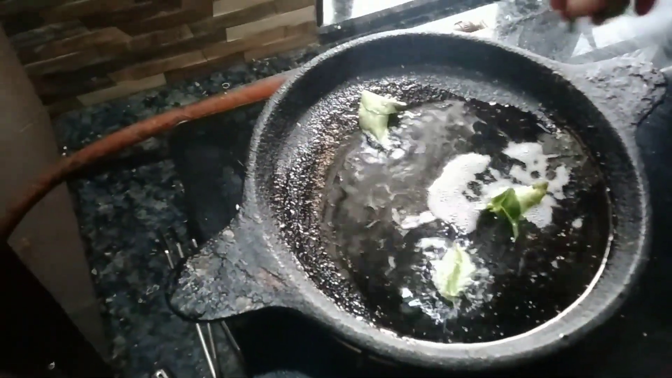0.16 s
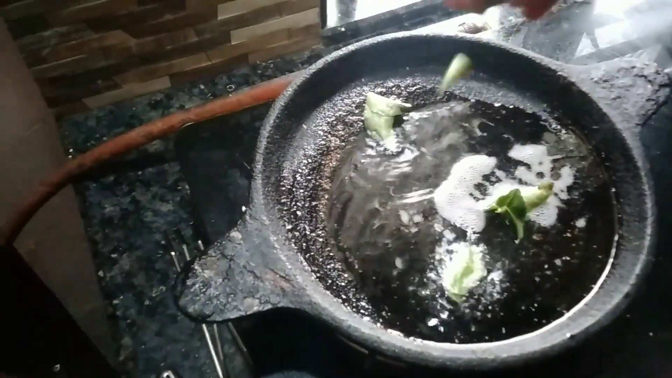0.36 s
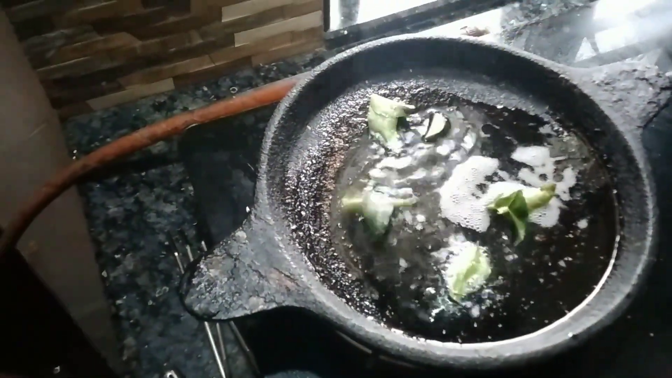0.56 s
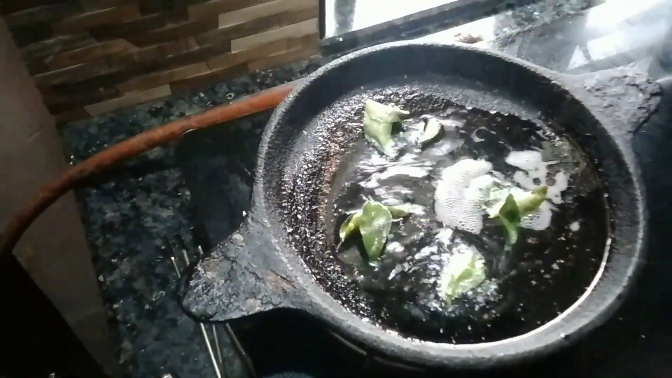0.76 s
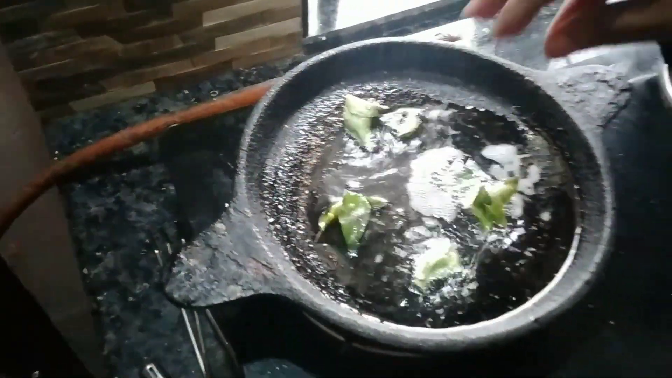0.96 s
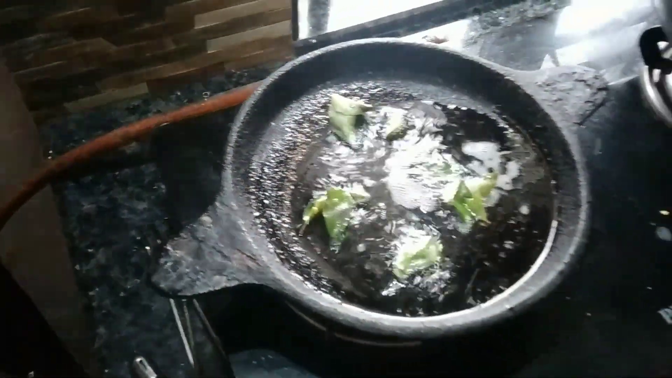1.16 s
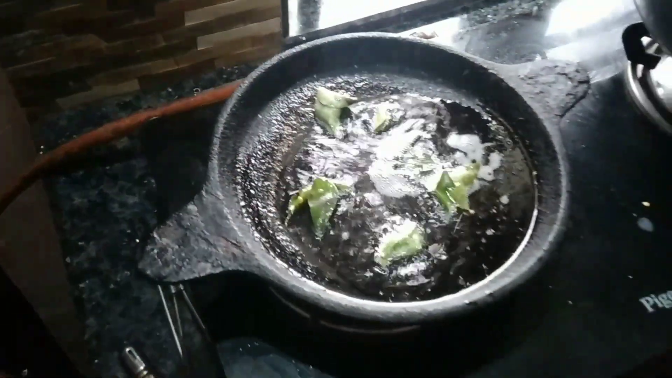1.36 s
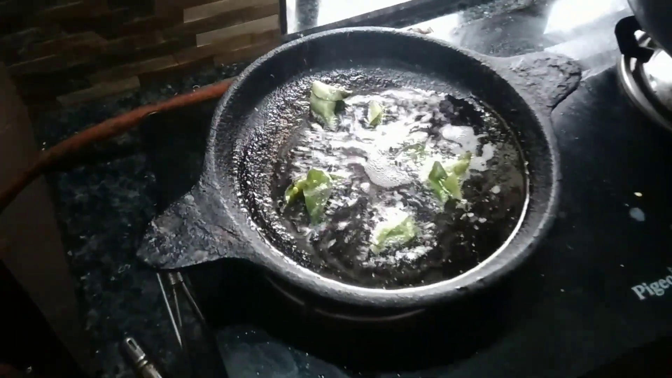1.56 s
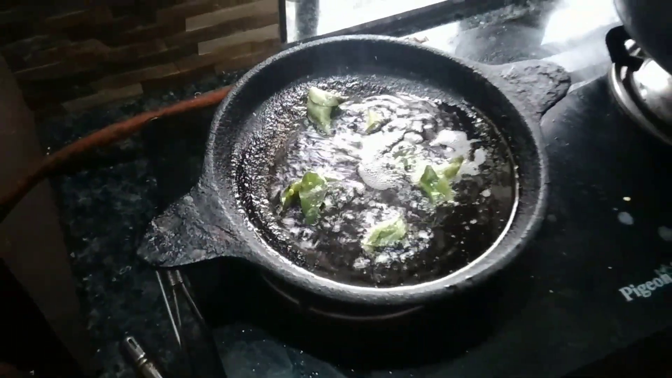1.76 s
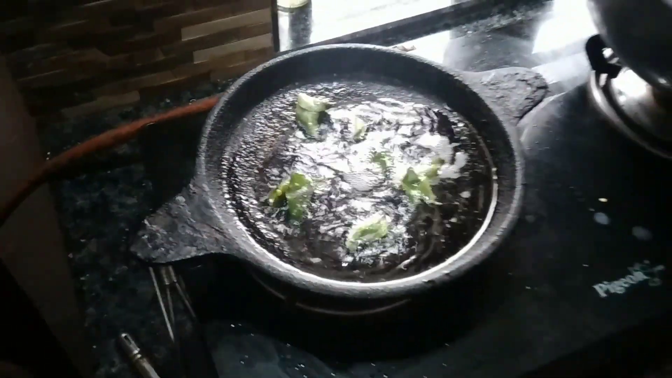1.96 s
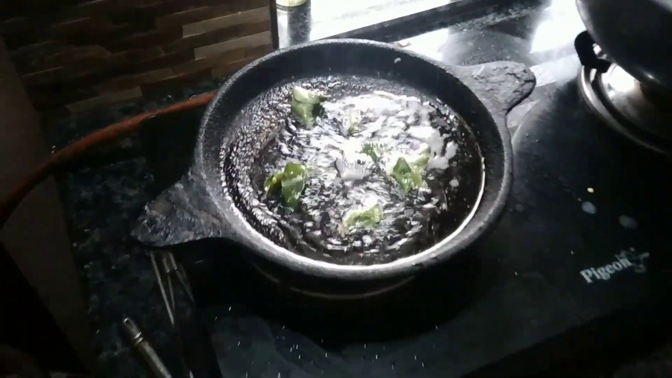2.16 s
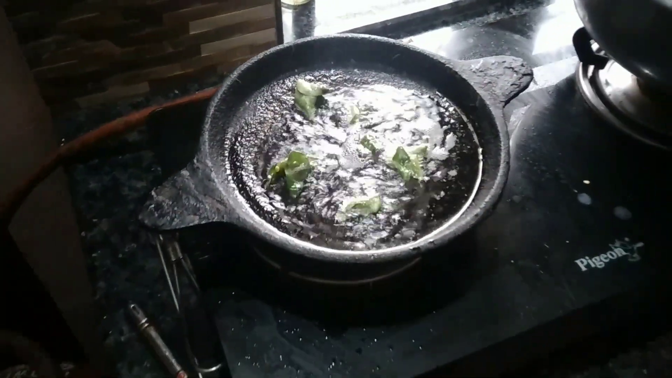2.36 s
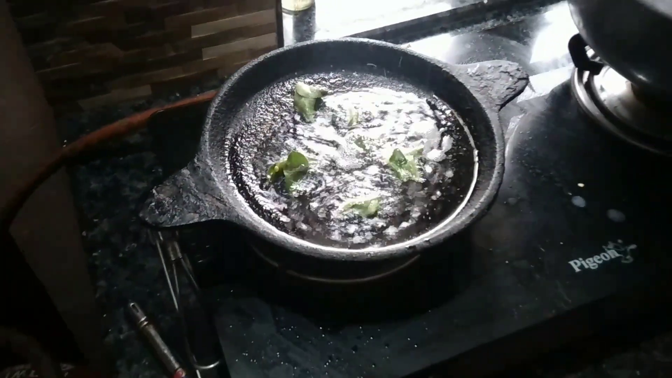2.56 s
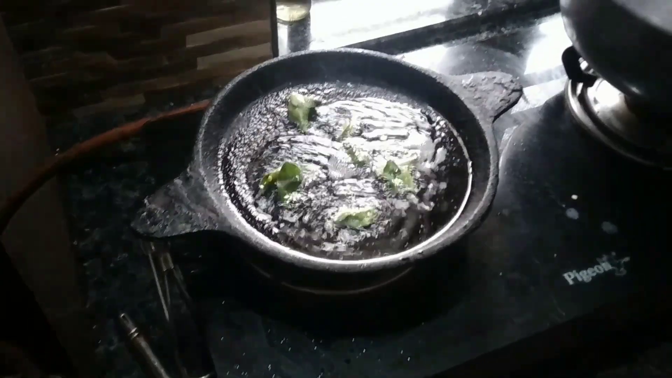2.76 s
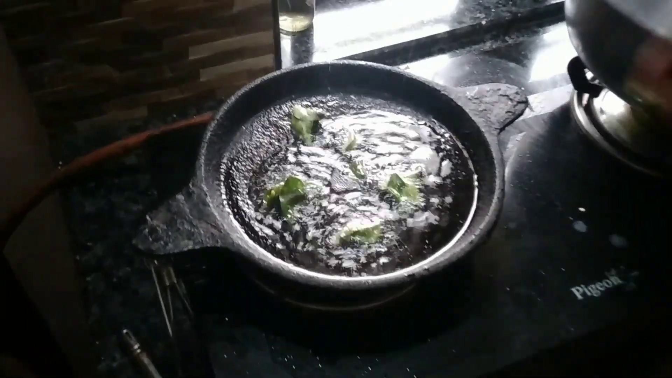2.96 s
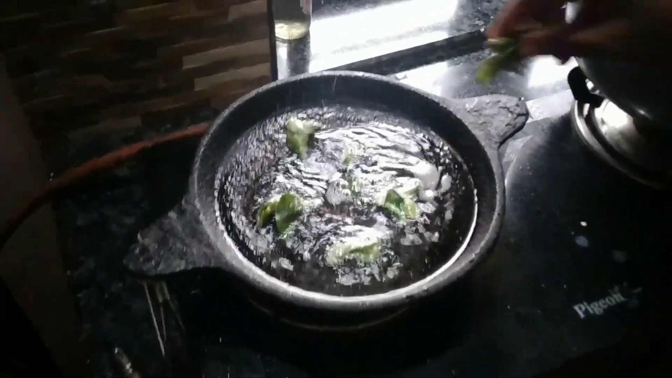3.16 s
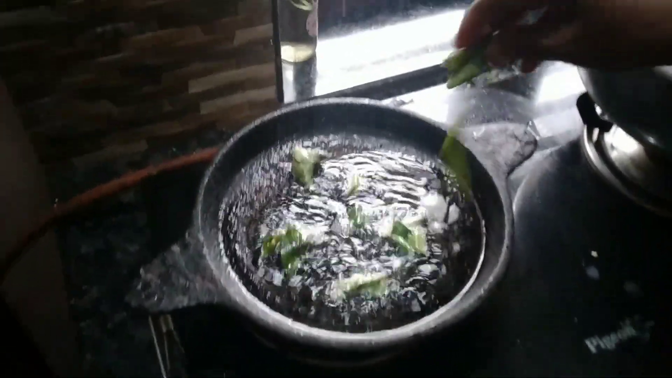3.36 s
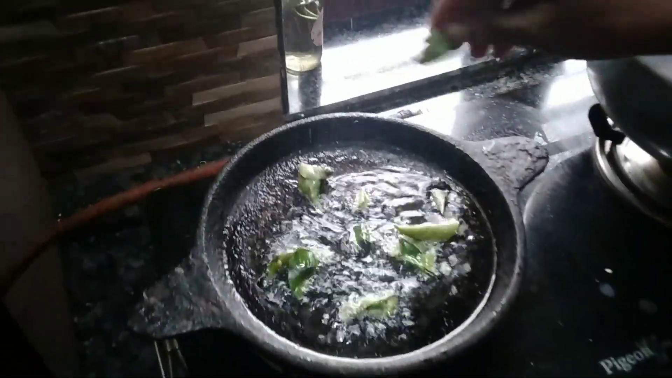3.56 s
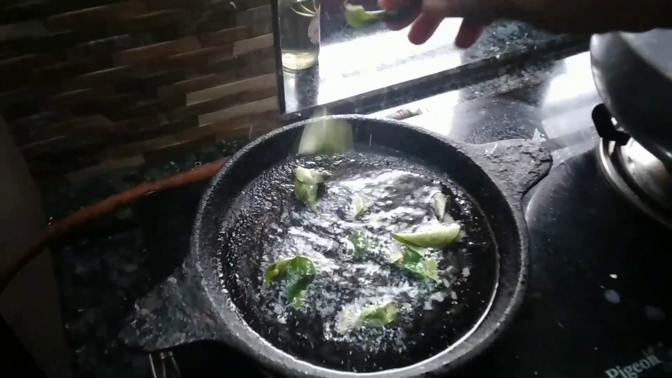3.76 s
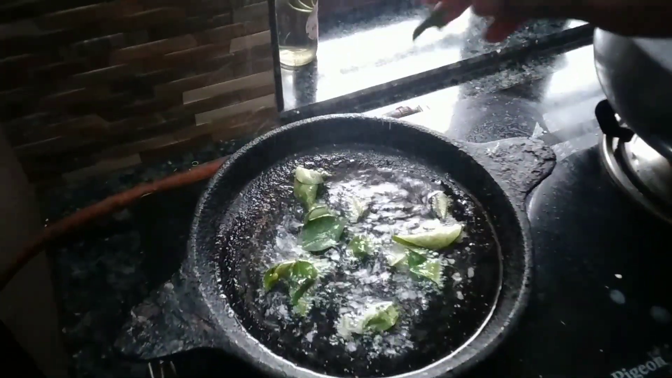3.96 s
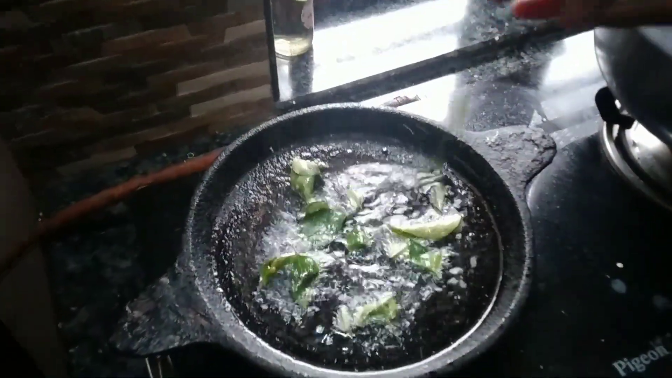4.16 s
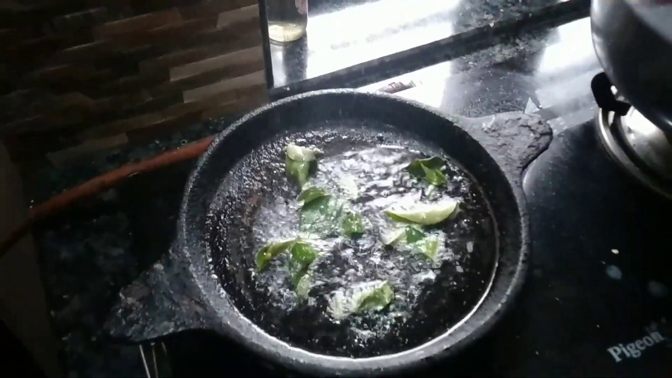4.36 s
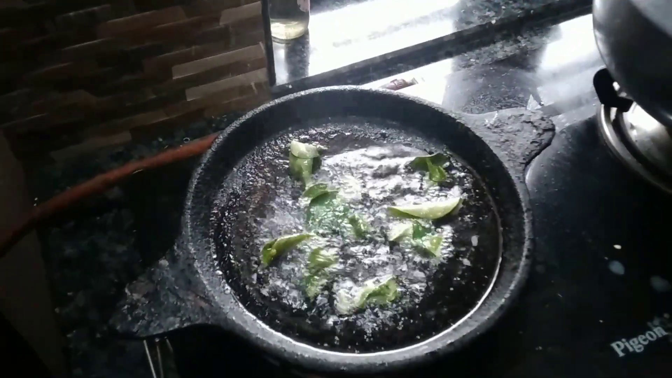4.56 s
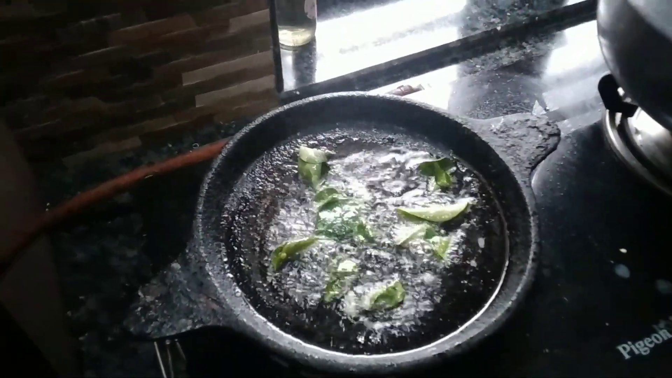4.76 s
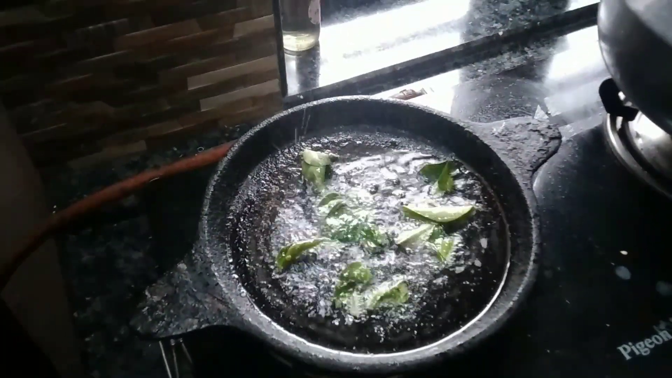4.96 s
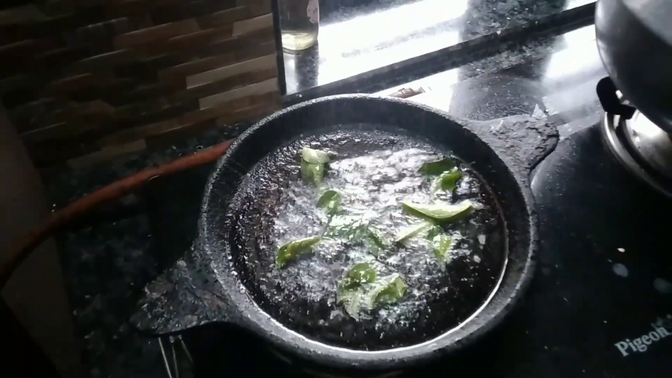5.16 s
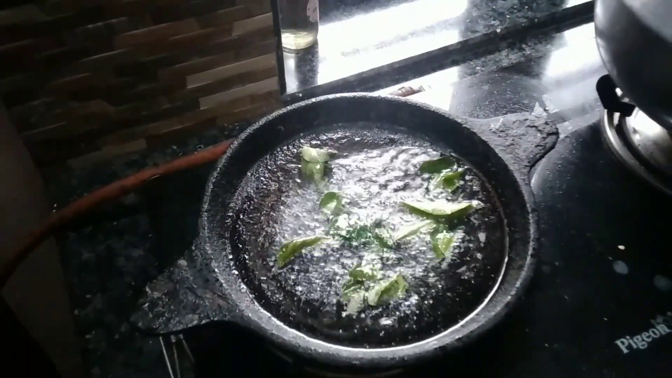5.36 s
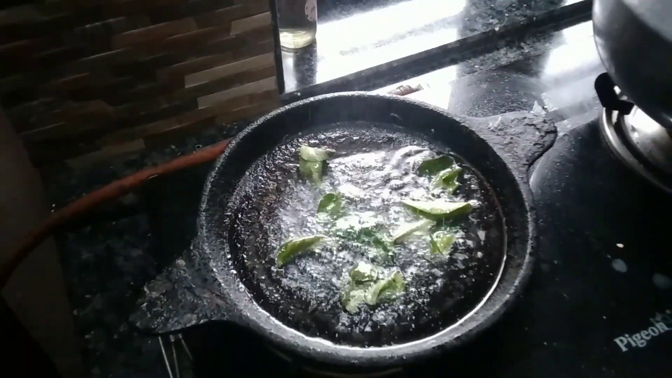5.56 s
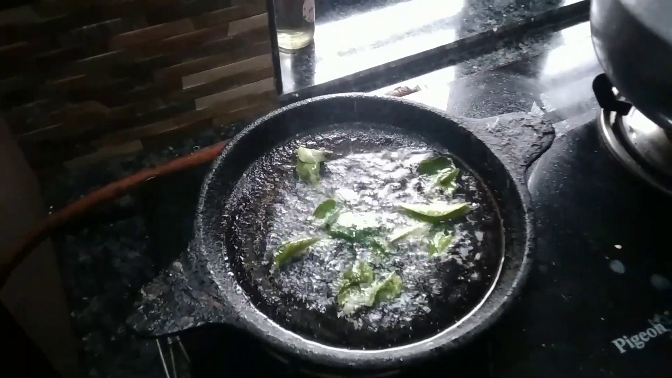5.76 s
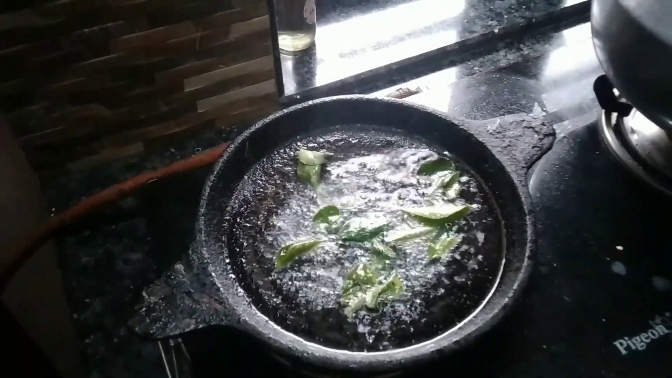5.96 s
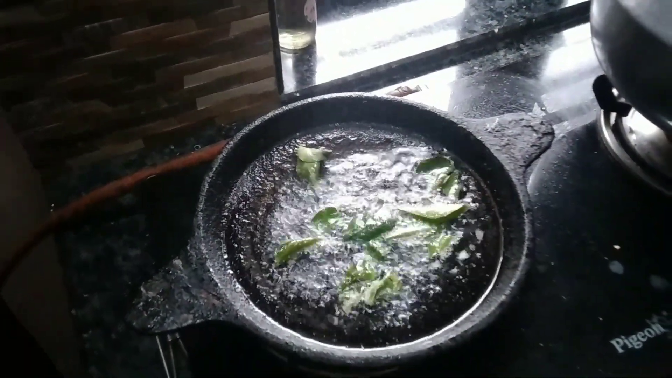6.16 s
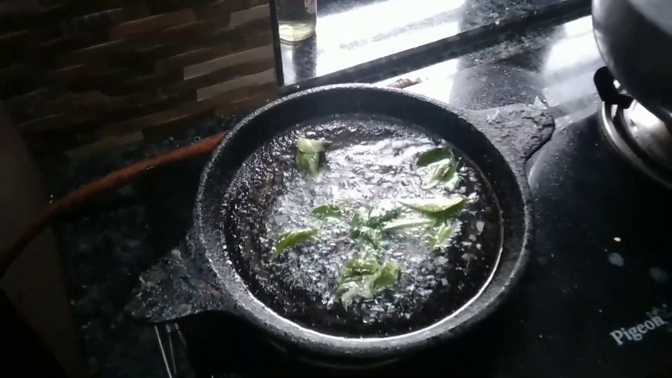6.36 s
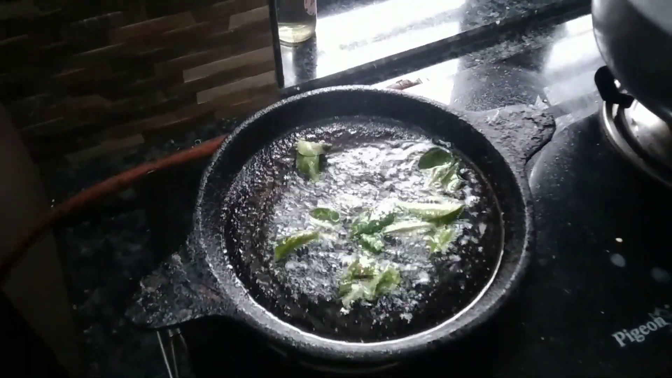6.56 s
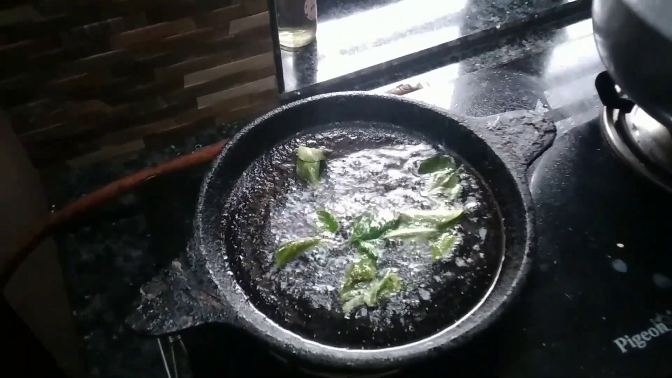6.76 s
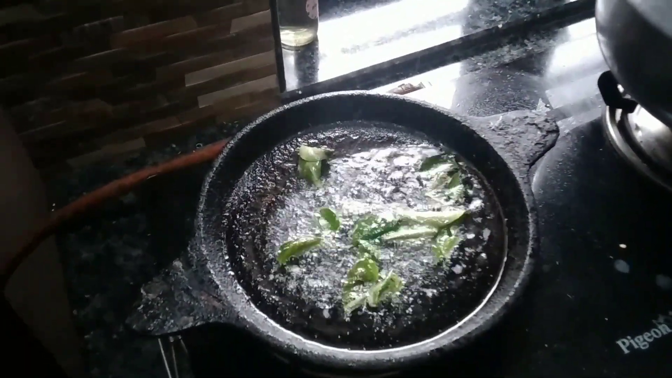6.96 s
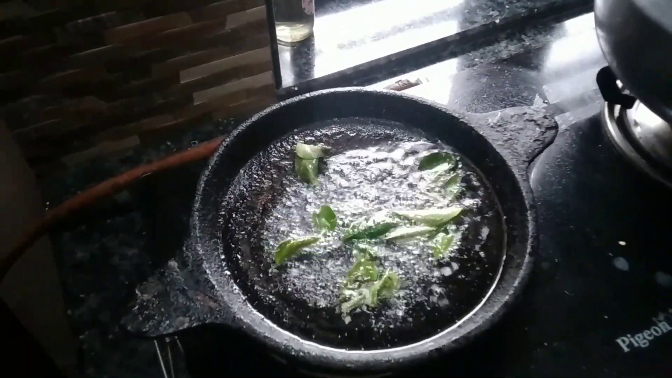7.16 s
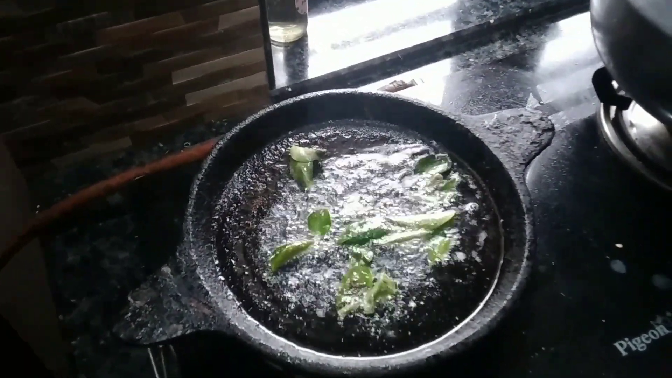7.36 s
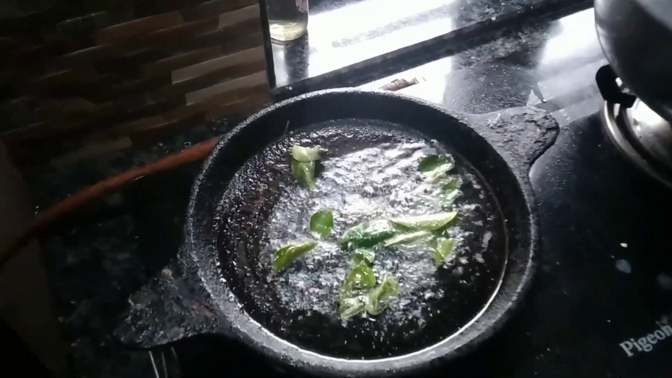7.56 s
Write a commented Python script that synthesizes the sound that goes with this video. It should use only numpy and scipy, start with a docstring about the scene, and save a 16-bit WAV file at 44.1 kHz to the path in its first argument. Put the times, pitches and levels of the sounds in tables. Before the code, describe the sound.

Close up, wet leaves sizzle in an iron pan of hot oil. The fizz dips at first, then swells over several seconds, with bubbling gurgles and constant irregular pops and sharp snaps that briefly ring the pan. A distant thud comes midway; around five seconds a hard splash jolts the stereo microphone at the peak. The sizzle eases slightly and a louder thud follows, over low kitchen rumble.

```python
"""Wet leaves fry in an iron pan of hot oil, close to a hand-held microphone with two ports.
From the start, over a low room rumble, clumps of tiny bubbles fizz, large ones gurgle, water pops and snaps.
The fizz sinks at first, then grows; all bubbles are short rising tones that echo and ring the pan.
A far thud falls in the kitchen midway. Near 5 s one splash jolts the microphone as the fizz peaks.
The fizz then eases a little, and a second, louder thud follows before the end."""
import sys
import numpy as np
from scipy import signal
from scipy.fft import rfft, irfft, next_fast_len
from scipy.io import wavfile
from scipy.ndimage import uniform_filter1d

SR = 44100
rng = np.random.default_rng(int(sys.argv[2]) if len(sys.argv) > 2 else 0)


def put_to_file(sound):
    """Save the sound as 16-bit audio at rate SR, in the file named by the first command-line argument."""
    columns = np.atleast_2d(sound).T  # one column per channel
    safe = np.clip(columns, -1, 1)
    whole_steps = np.round(safe * 32767)
    wavfile.write(sys.argv[1], SR, whole_steps.astype(np.int16))


def attenuation_scalar(level_db):
    """Turn a level in dB into a linear amplitude multiplier (20 dB per decade)."""
    decades = np.asarray(level_db, float) / 20
    return 10 ** decades


N = 336483  # length in samples

# The room: tilt of the rumble (frequency [Hz], gain [dB])
RUMBLE_COLOUR = [(50, -7), (80, -18), (150, 15), (200, -3), (300, 7), (500, -3), (900, 12), (1500, -53)]
# Wavering room tones (frequency [Hz], level [dB], rate of wavering [Hz])
ROOM_TONES = [(68.6, -63, 17), (134.8, -57.5, 38), (233.7, -60, 1.2), (355, -62.5, 6.1), (475, -61.5, 10)]
# Changes in the air moving past the ports (time [s], lift [dB], length [s])
GUSTS = [(1.55, 10, 0.21), (2.75, 2, .3), (3.15, 2, .2), (4.5, -1, .15), (5.75, 10, 0.33), (6.9, 1, .4)]
# Far thuds (time [s], level [dB])
THUD_TIMES = [(3.6, -10), (6.842, -3)]
# Tones inside each thud (frequency [Hz], level [dB], time to fall 60 dB [s])
THUD_TONES = [(119.5, -39, 0.73), (357, -33.5, 0.95), (515, -35.5, 1)]
# Ringing tones of the iron pan (frequency [Hz], relative level [dB], time to fall 60 dB [s])
PAN_TONES = [(920, -16.5, 0.13), (1023, -11.5, .1), (1098, -9, 0.18), (1389.4, -2.5, 0.14),
             (1537, -15, .25), (1630, -10.5, 0.21), (1850, -5, 0.075), (1893, -5.5, 0.14), (1956, -9, 0.16),
             (2260, -7, 0.18), (2400, -1, .03), (2603, -4, 0.044), (2647, -6, .2), (4020, -5, 0.08)]
# Water drops boiling off under the oil
# (time [s], peak level [dB], starting pitch [Hz], low push [dB relative], ring length [cycles])
POPS = [(0.007, -18, 1730, -23, 3.7), (0.018, -22, 1080, -28, 1.4), (0.051, -22, 2750, -34, 6.2),
        (0.189, -23, 2570, -27, 2.8), (0.214, -23, 1870, -4, 1.4), (0.285, -18, 2650, -34, 4),
        (0.521, -19, 1900, -33, 5), (0.542, -15.5, 1860, -35, 5), (0.592, -14.5, 2570, -34, 3),
        (0.619, -8, 1690, -41, 4.3), (0.751, -24, 1690, -27, 2.3), (0.887, -18, 1830, -32, 3.1),
        (0.922, -14.5, 2640, -33, 3.3), (0.962, -14, 1800, -32, 1.8), (1.0, -18, 2590, -25, 6),
        (1.04, -15.5, 1500, -33, 2.1), (1.05, -16, 2640, -30, 4), (1.137, -14.5, 2650, -36, 2.3),
        (1.345, -19, 2370, -21, 2.5), (1.465, -14.5, 2380, -41, 4), (1.538, -12.5, 2530, -22, 4),
        (1.58, -10, 1830, -29, 3), (1.694, -18, 1860, -36, 6.3), (1.72, -15, 1850, -34, 6.5),
        (1.751, -16.5, 1810, -35, 4), (1.807, -9, 1800, -31, 9.4), (1.934, -14, 1900, -29, 2.4),
        (1.947, -13.5, 1870, -16, 2.9), (2.114, -25, 1900, -25, 3.7), (2.204, -23, 1080, -28, 3.6),
        (2.302, -13.5, 1890, -36, 6.7), (2.437, -10, 1940, -41, 6.1), (2.46, -15.5, 2570, -33, 5.6),
        (2.593, -15, 1870, -33, 2.9), (2.882, -18, 1920, -26, 4.8), (2.935, -23, 1900, -40, 4),
        (2.953, -8.5, 2650, -33, 2), (3.078, -12, 1850, -27, 2.9), (3.145, -18, 2400, -25, 3.1),
        (3.221, -14, 1880, -29, 5.6), (3.331, -14, 1880, -26, 4), (3.373, -19, 1890, -34, 5.7),
        (3.391, -13, 1904, -30, 11), (3.506, -17, 2650, -34, 4), (3.535, -16, 1890, -28, 8.3),
        (3.627, -4, 1710, -34, 7), (3.695, -14, 1390, -32, 6), (3.712, -7, 1900, -29, 12),
        (3.787, -15, 1840, -19, 4), (3.833, -12.5, 2580, -29, 2.5), (3.898, -14, 1910, -25, 2.4),
        (3.956, -13, 1590, -25, 2.2), (4.069, -20, 2650, -30, 3.5), (4.118, -20, 1160, -31, 2.4),
        (4.186, -19, 2660, -30, 3.7), (4.218, -20, 1370, -30, 5.7), (4.319, -7.5, 1840, -29, 3.7),
        (4.333, -3, 1890, -29, 2), (4.379, -12, 1760, -34, 4), (4.529, -8.5, 2590, -33, 2.3),
        (4.582, -14, 2730, -33, 2.8), (4.624, -10, 2800, -35, 3.6), (4.659, -22, 1970, -31, 6.2),
        (4.734, -12.5, 1930, -36, 7.7), (4.759, -14, 1430, -33, 3.7), (4.812, -11.5, 1870, -32, 6.3),
        (4.839, -15.5, 1330, -31, 2.6), (4.904, -9, 1930, -35, 3.2), (5.021, -10.5, 2600, -40, 4),
        (5.077, -17, 2640, -28, 3.4), (5.126, -10.5, 2030, -29, 2.9), (5.209, -13, 2220, -25, 4),
        (5.313, -21, 1940, -32, 5.1), (5.389, -13, 1690, -27, 1.3), (5.496, -13.5, 1720, -28, 2.7),
        (5.553, -11.5, 1910, -32, 4), (5.595, -17, 1390, -29, 7.3), (5.727, -15, 1850, -31, 4),
        (5.822, -15.5, 1860, -31, 4), (5.927, -16, 1850, -27, 4), (6.069, -13, 1790, -31, 1.5),
        (6.101, -12, 1810, -31, 2.3), (6.129, -11, 2620, -35, 4.8), (6.241, -12.5, 2540, -38, 5.9),
        (6.307, -11.5, 2920, -35, 4), (6.416, -31, 1720, -26, 4.8), (6.544, -14.5, 1880, -37, 4.6),
        (6.578, -13, 2490, -29, 3.3), (6.773, -16, 1940, -27, 4), (6.866, -22, 1670, -22, 3.4),
        (6.924, -19, 1370, -20, 3.6), (7.004, -21, 2400, -17, 3.3), (7.027, -18, 1360, -17, 2.6),
        (7.041, -12.5, 1950, -31, 4), (7.161, -17, 1760, -27, 4), (7.184, -16, 1900, -31, 4.9),
        (7.334, -22, 1360, -42, 4), (7.606, -19, 2660, -31, 5.8)]
# Sharp bursts at the surface
# (time [s], peak level [dB], starting pitch [Hz], air from 8 kHz up [dB relative to the burst])
SNAPS = [(0.017, -24, 5380, -36), (0.0232, -10.5, 4400, -36), (0.0314, -5.5, 5320, -41),
         (0.1393, -15, 3850, -29), (0.154, -10, 6100, -33), (0.19, -7.5, 6100, -35),
         (0.2463, -14, 6180, -31), (0.2614, -20, 5250, -30), (0.2882, -13, 4330, -33),
         (0.3215, -7.5, 6200, -40), (0.389, -19.5, 6300, -22), (0.4341, -6.5, 5700, -39),
         (0.4696, -19, 6340, -35), (0.5316, -14, 3870, -33), (0.5933, -14, 5500, -29),
         (0.6534, -27, 3900, -20), (0.7507, -9, 6400, -29), (0.7782, -15, 3940, -30),
         (0.8283, -13, 6200, -25), (0.865, -7, 6000, -30), (0.8734, -6.5, 5970, -33),
         (1.0412, -6, 6200, -29), (1.1, -12, 6140, -27), (1.1836, -14, 3540, -24), (1.2367, -12, 6030, -12),
         (1.2615, -13, 6800, -6), (1.3912, -20, 3750, -29), (1.4646, -5.5, 4100, -35),
         (1.5663, -24, 3820, -18), (1.6225, -3.5, 6340, -15), (1.6536, -23, 4230, -26),
         (1.6736, -9, 6410, -30), (1.705, -16, 5630, -24), (1.752, -14, 4540, -24),
         (1.926, -7.5, 6480, -25), (1.933, -8.5, 6200, -15), (2.0955, -15, 3910, -27),
         (2.2137, -11.5, 4290, -8), (2.3268, -9, 4960, -20), (2.377, -16, 4440, -32),
         (2.571, -8.5, 6400, -11), (2.6394, -17, 4530, -11), (2.6778, -6, 5550, -13),
         (2.9617, -9, 3760, -36), (3.0245, -24, 4230, -23), (3.0764, -13, 4540, -30),
         (3.234, -12, 4340, -32), (3.3633, -10, 5270, -23), (3.4032, -6, 4580, -22),
         (3.4593, -8, 6290, -31), (3.4895, -16, 4820, -29), (3.5269, -5.5, 4700, -34),
         (3.634, -7, 4270, -30), (3.715, -14, 4370, -33), (3.7597, -8, 5600, -28), (3.9556, -10, 3820, -23),
         (3.9777, -9, 6300, -28), (3.99, -10, 4500, -32), (4.1173, -12, 3700, -29),
         (4.1935, -11, 5280, -20), (4.2804, -7, 6740, -28), (4.3116, -27, 4730, -23),
         (4.3303, -10, 4450, -22), (4.752, -12, 6130, -25), (4.8409, -8, 4570, -7), (5.004, -16, 6340, -24),
         (5.0863, -12, 4400, -26), (5.1124, -14, 6110, -17), (5.126, -3, 4650, -17),
         (5.2769, -11, 3740, -28), (5.3817, -8, 4380, -25), (5.5168, -6, 6290, -23), (5.57, -6, 5900, -35),
         (5.649, -6.5, 4330, -5), (5.7614, -15, 4510, -29), (5.8973, -9, 4350, -28),
         (5.9863, -7.5, 4260, -36), (6.0686, -19, 4440, -30), (6.1908, -6, 5600, -13),
         (6.2395, -17, 4620, -31), (6.417, -11, 3830, -23), (6.6576, -10, 4300, -28),
         (6.7408, -6.5, 4320, -21), (6.8947, -6, 3870, -26), (7.1428, -3.5, 5900, -41),
         (7.223, -6.5, 3740, -32), (7.3332, -12, 4860, -29), (7.3781, -24, 4160, -25),
         (7.4011, -10, 4310, -30), (7.433, -4, 4400, -11), (7.581, -12, 3860, -24),
         (7.6107, -13, 4270, -24)]
# How hard the wet leaves boil, given as the level of the fizz (time [s], level [dB])
FRYING = [(0, -31), (0.099, -36), (.3, -39), (.4, -39), (.55, -34), (.9, -31), (1.1, -29.5), (1.45, -26.5),
          (2.2, -25), (2.45, -27), (3.1, -25), (3.35, -25.5), (3.5, -24.5), (3.8, -23.5), (4.2, -22),
          (4.7, -22.5), (5.15, -21), (6.2, -22.5), (6.5, -22.5), (7.63, -24)]
# A leaf spits a short flurry of large bubbles and spray (time [s], lift [dB], length [s])
FLURRIES = [(.68, 6, 0.053), (.89, 1.5, 0.083), (1.06, 2.5, 0.031), (1.93, 6.5, 0.037), (3.4, 4.5, 0.15),
            (3.7, 5, 0.14), (3.89, 7, 0.059), (3.97, 4.5, 0.072), (4.12, 4.5, 0.042), (4.27, 5.5, 0.11),
            (5.12, 2.5, 0.11), (5.65, 3, 0.031), (6.2, 2.5, 0.092), (6.95, 1.5, 0.21), (7.1, 2, 0.035)]
# Tone colour of the small bubbles (frequency [Hz], gain [dB])
FIZZ_COLOUR = [(1500, -18), (2500, -2), (3200, -6), (4300, -0.5), (6600, -1.5), (7500, -6.5), (8600, -33),
               (11000, -19.5), (15600, -48)]
# Tone colour of the fine spray (frequency [Hz], gain [dB])
MIST_COLOUR = [(6000, -1), (8000, 7.5), (9000, 4), (10700, 5.5), (12500, -4.5), (15600, -0.5)]
# Tone colour of the large bubbles (frequency [Hz], gain [dB])
GURGLE_COLOUR = [(150, -59), (250, -21.5), (587, -14.5), (760, -9.5), (1080, -6), (1480, -8), (1880, -1.5),
                 (2070, -8.5), (3200, -18), (4160, -15), (7040, -120)]
# How the two ports differ (frequency [Hz], left over right [dB])
PORT_BALANCE = [(60, 2), (300, 1), (1000, 1), (2800, 0.5), (3800, 6.5), (4600, 11.5), (5600, 15),
                (6800, 19), (8000, 7.5), (9500, -8.5), (11000, -16.5), (13000, -2), (15500, -7)]

FULL_BOIL_DB = -22  # fizz level at which all the oil bubbles; below it the bubbles thin out
GURGLE_DB, MIST_DB = -29, -41.5  # levels at full boil
GURGLE_FOLLOWS, MIST_FOLLOWS = 0.66, 0.75  # dB per dB of boiling
MIST_FLURRY = 0.47  # share of a flurry's lift that reaches the spray


def evened(x):
    """Scales a sound to an rms of 1."""
    return x / np.sqrt(np.mean(x ** 2) + 1e-20)


def read(points, hz):
    """Reads a tone colour between its points, on a log-frequency axis."""
    f, value = np.transpose(points)
    return np.interp(np.log(hz + 1), np.log(f + 1), value)


def coloured(x, db):
    """Makes each frequency louder or softer by the gain that db(frequency) returns."""
    size = next_fast_len(N)
    gain = attenuation_scalar(db(np.fft.rfftfreq(size, 1 / SR)))
    return irfft(rfft(x, size) * gain, size)[..., :N]


def wander(hz):
    """Random drift, mostly slower than the given rate."""
    return evened(signal.lfilter(*signal.butter(1, hz, fs=SR), rng.standard_normal(N)))


def lifts(rows):
    """Smooth bumps in dB over time."""
    t = np.arange(N) / SR
    return sum(db * np.exp(-.5 * (2 * (t - s) / max(length, .01)) ** 2) for s, db, length in rows)


def add(mix, s, sound):
    """Mixes a sound in at a time in seconds, in place."""
    part = mix[:, round(s * SR):][:, :sound.shape[1]]
    part += sound[:, :part.shape[1]]


def rumble():
    """Low noise of the room, mostly shared by the two ports."""
    shared, left, right = rng.standard_normal((3, N))
    noise = np.array([shared + 0.5 * left, shared + 0.5 * right])
    return attenuation_scalar(-54.5) * evened(coloured(noise, lambda hz: read(RUMBLE_COLOUR, hz)))


def room_tones():
    """Steady pitches whose strength and phase drift, the same at both ports."""
    t = np.arange(N) / SR
    out = np.zeros(N)
    for hz, db, width in ROOM_TONES:
        turn = 2 * np.pi * hz * t
        out += attenuation_scalar(db) * (wander(width) * np.sin(turn) + wander(width) * np.cos(turn))
    return out


def stirring_air():
    """Air moving past the ports: very low noise whose level wanders and gusts."""
    shared, left, right = rng.standard_normal((3, N))
    low = signal.butter(3, 50, fs=SR, output="sos")
    stir = signal.sosfilt(low, [left + 0.93 * shared, right + 1.6 * shared])
    drift_db = -1.5 * evened(uniform_filter1d(wander(1.5), 4000))
    return evened(stir) * attenuation_scalar(-58.5 + drift_db + lifts(GUSTS))


def thuds():
    """Far knocks: a few low tones die away unevenly, with noise thrown back by the walls."""
    t = np.arange(SR // 2) / SR
    chance = rng.standard_normal((len(THUD_TONES), len(t)))
    smear = 1 + 0.84 * evened(uniform_filter1d(chance, 400, 1))
    tones = sum(uneven * attenuation_scalar(db - 60 * t / t60) * np.sin(2 * np.pi * hz * t)
                for uneven, (hz, db, t60) in zip(smear, THUD_TONES))
    band = signal.butter(2, [100, 1300], "band", fs=SR)
    walls = signal.lfilter(*band, rng.standard_normal((3, len(t))))
    echo = evened(walls[0] + .5 * walls[1:]) * attenuation_scalar(-30 - 60 * t / 0.94)
    out = np.zeros((2, N))
    for s, db in THUD_TIMES:
        add(out, s, attenuation_scalar(db) * (tones + echo))
    return out


def kitchen():
    """Everything heard behind the pan."""
    return rumble() + room_tones() + stirring_air() + thuds()


def bubble(hz, cycles, glide, size=700):
    """A steam bubble: a few cycles that start softly, rise in pitch and die."""
    turns = np.arange(size) * hz / SR
    swell = (1 - np.exp(-turns / 0.36)) * np.exp(-turns / cycles)
    return swell * np.sin(2 * np.pi * turns * (1 + glide * turns / cycles))


def paths(near_db, t60, size=2600):
    """From one spot in the pan to both ports: direct sound, then rim and counter reflections."""
    t = np.arange(size) / SR
    present = rng.random((2, size)) < .08
    taps = rng.standard_normal((2, size)) * present * attenuation_scalar(near_db - 60 * t / t60)
    taps[:, :24] = 0
    taps[0, rng.integers(7, 14)] = 1  # direct sound; its delay at the left port varies
    taps[1, 8] = 1
    # the oil surface and the near rim
    taps[[0, 1], rng.integers(20, 60, 2)] = 0.45 * rng.choice([-1, 1], 2)
    return taps


def pan(sound, ring_db):
    """The iron rings with whatever bursts on it; each spot wakes the tones in its own shares."""
    t = np.arange(SR // 7) / SR
    ring = np.zeros((2, len(t)))
    for hz, db, t60 in PAN_TONES:
        share = rng.uniform(0.079, 1.99) * rng.choice([-1, 1])
        phase = rng.uniform(0, 1.85, (2, 1))
        ring += share * attenuation_scalar(db - 60 * t / t60) * np.sin(2 * np.pi * hz * t + phase)
    rung = attenuation_scalar(ring_db) * signal.fftconvolve(sound, ring, axes=1)
    add(rung, 0, sound)
    return rung


def pops():
    """A crack, a large bubble with a low push and a few weaker ones after it set the pan ringing."""
    out = np.zeros((2, N))
    n = np.arange(2200)
    for s, db, hz, push_db, cycles in POPS:
        burst = bubble(hz, max(cycles, .5), 0.0031) * (1 - np.exp(-np.arange(700) / 3.2))
        burst += 0.6 * bubble(hz * 0.669, 2.57, 0.126)
        burst += attenuation_scalar(push_db) * bubble(464, 0.62, 0.054)  # low push
        burst += 0.59 * bubble(3400, 0.92, 0.1)  # crack
        after = (rng.random(2200) < .006) * rng.uniform(-0.47, 0.21, 2200) * np.exp(-n / 3300.0)
        after[0] = 1
        group = np.convolve(burst, after)
        sound = pan(signal.fftconvolve(paths(-25.5, 0.23), group[None], axes=1), -51.5)
        add(out, s, attenuation_scalar(db) * sound / abs(sound.mean(0)).max())  # peak of the two-port average
    return out


def snaps():
    """A click, a short ring and a spray of droplets, which also ring the pan."""
    out, t = np.zeros((2, N)), np.arange(700) / SR
    crack_band = signal.butter(1, [1000, 7500], "band", fs=SR)
    air_band = signal.butter(2, [8000, 12500], "band", fs=SR)
    for s, db, hz, air_db in SNAPS:
        spray = rng.standard_normal(700) * np.exp(-t / 0.00017)
        burst = bubble(hz, 3.2, 0.004) + .35 * signal.lfilter(*crack_band, spray)
        burst = signal.lfilter(*signal.butter(3, 8000, fs=SR), burst)
        air = signal.lfilter(*air_band, spray)
        burst += attenuation_scalar(air_db) * air * abs(burst).max() / abs(air).max()
        sound = pan(signal.fftconvolve(paths(-23.0, 0.18), burst[None], axes=1), -38)
        add(out, s, attenuation_scalar(db) * sound / abs(sound).max())
    return out


def bubbling(low_hz, top_hz, per_s, spread_db, clump, clump_hz, cycles, near_db, ring_db, count=18):
    """Bubbles of many sizes from many spots; they come in clumps and a few are large."""
    busy = np.exp(clump * wander(clump_hz))
    chance = busy / busy.mean() * per_s / count / SR  # per sample, for each size
    out = np.zeros((2, N))
    for hz in np.geomspace(low_hz, top_hz, count):
        strength = attenuation_scalar(spread_db * np.minimum(rng.exponential(1, N), 3))
        train = (rng.random(N) < chance) * strength
        grain = bubble(hz, cycles, 0.022)
        grain = grain[None] * np.sqrt(hz) / np.linalg.norm(grain)
        sound = signal.fftconvolve(paths(near_db, 0.082), grain, axes=1)
        out += signal.oaconvolve(train[None], pan(sound, ring_db), axes=1)[:, :N]
    return evened(out)


def sizzle():
    """Fizz, gurgle and spray follow the boiling; a weak boil means sparser bubbles."""
    fizz_db = np.interp(np.arange(N) / SR, *np.transpose(FRYING))
    under_db, flurry_db = fizz_db - FULL_BOIL_DB, lifts(FLURRIES)
    crowd = np.minimum(attenuation_scalar(under_db), 1)  # share of the bubbles at work
    small = bubbling(1700, 7580, 4000 * crowd, spread_db=6.0, clump=0.33, clump_hz=25.4,
                     cycles=0.51, near_db=-14, ring_db=-69)
    mist = bubbling(7200, 11800, 9000, spread_db=8, clump=0.32, clump_hz=25.4,
                    cycles=2, near_db=-30, ring_db=-68, count=10)
    ticks = bubbling(2870, 15300, 500 * crowd, spread_db=1.5, clump=.5, clump_hz=9.2,
                     cycles=0.74, near_db=-8.0, ring_db=-59, count=10)
    large = bubbling(328, 2706, 1200 * crowd, spread_db=4, clump=.5, clump_hz=20,
                     cycles=0.97, near_db=-17.0, ring_db=-40.5)
    cracks = bubbling(500, 6760, 260, spread_db=4.5, clump=.6, clump_hz=12,
                      cycles=0.74, near_db=-39, ring_db=-34, count=12)
    # sparser bubbles are made stronger, so that the levels below set the loudness
    small, ticks, large = (x / np.sqrt(crowd / crowd.mean()) for x in (small, ticks, large))

    fizz = small + attenuation_scalar(-5.5) * ticks + attenuation_scalar(-4) * cracks
    fizz = evened(coloured(fizz, lambda hz: read(FIZZ_COLOUR, hz)))
    mist = evened(coloured(mist + ticks, lambda hz: read(MIST_COLOUR, hz)))
    gurgle = large + attenuation_scalar(-21.0) * ticks + attenuation_scalar(-14.5) * cracks
    gurgle = evened(coloured(gurgle, lambda hz: read(GURGLE_COLOUR, hz)))

    mist_db = MIST_DB + MIST_FOLLOWS * under_db + MIST_FLURRY * flurry_db
    gurgle_db = GURGLE_DB + GURGLE_FOLLOWS * under_db + flurry_db
    return fizz * attenuation_scalar(fizz_db) + mist * attenuation_scalar(mist_db) + gurgle * attenuation_scalar(gurgle_db)


def scene():
    """Everything that reaches the two ports."""
    return kitchen() + pops() + snaps() + sizzle()


def port_colours(dry):
    """Each port favours its own frequencies; the power of the two gains together stays the same."""
    sides = np.array([[1], [-1]])

    def gain_db(hz):
        balance_db = read(PORT_BALANCE, hz)
        return sides * balance_db / 2 - 10 * np.log10(np.cosh(balance_db * np.log(10) / 20))

    return coloured(dry, gain_db)


def jolt():
    """A splash shoves the membrane: a fast one-way push that fades, far stronger at the left port."""
    t = np.arange(SR // 3) / SR
    push = (1 - np.exp(-t / 0.00016)) * np.exp(-t / 0.039)
    return -attenuation_scalar([-12.5, -44])[:, None] * push


def low_pass(x):
    """Removes everything above the highest recorded frequency."""
    return signal.sosfilt(signal.butter(12, 15720, fs=SR, output="sos"), x)


def record(dry):
    """The microphone: port colours, the jolt, then overload that flattens peaks."""
    heard = port_colours(dry)
    add(heard, 5.1265, jolt())
    mix = np.clip(heard, -1, 1)
    return low_pass(mix)


dry = scene()
out = record(dry)
put_to_file(out)
```